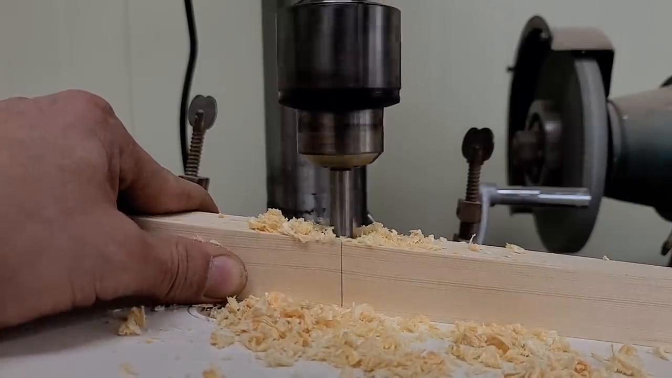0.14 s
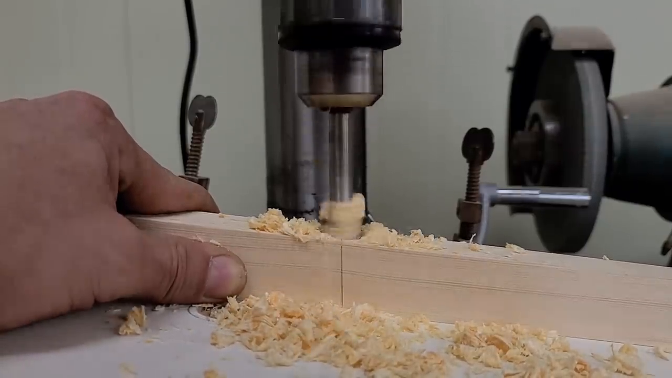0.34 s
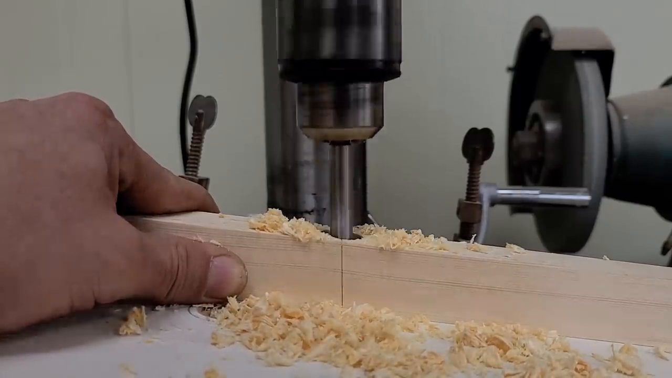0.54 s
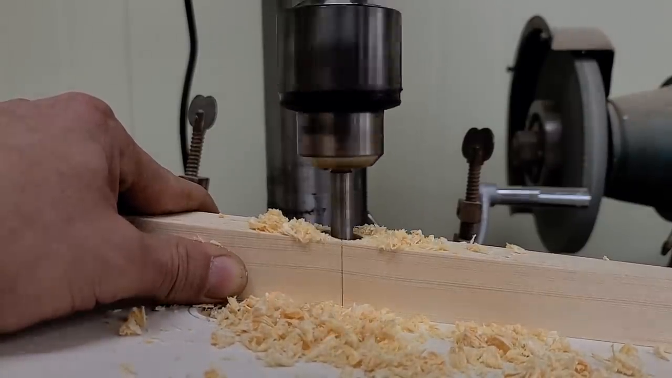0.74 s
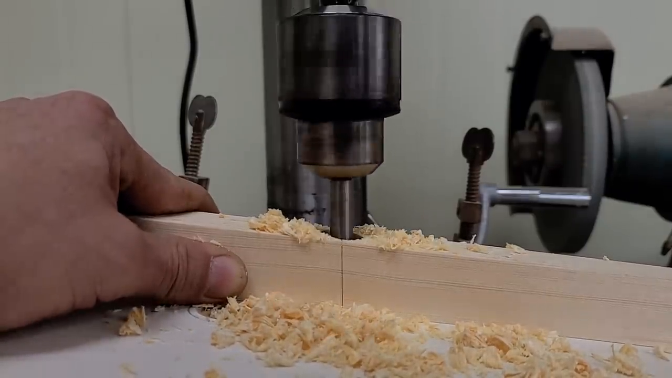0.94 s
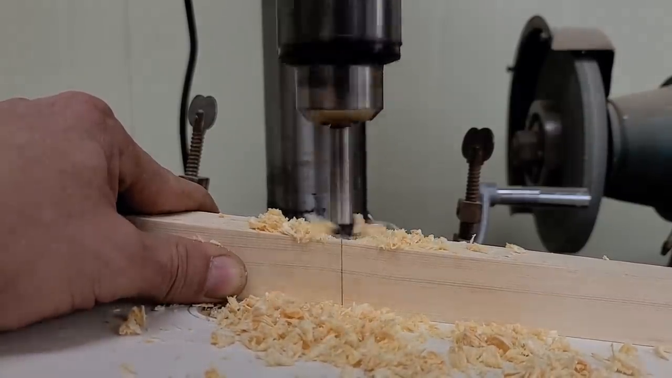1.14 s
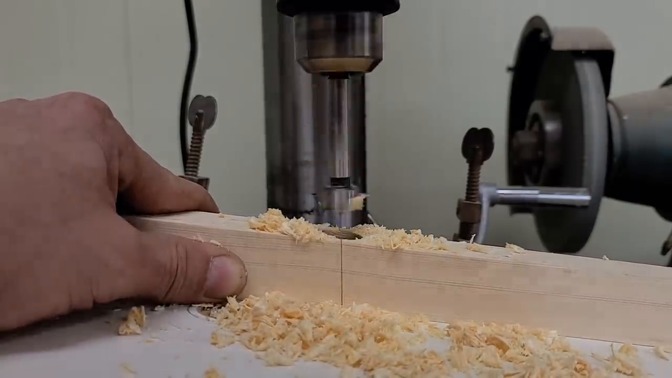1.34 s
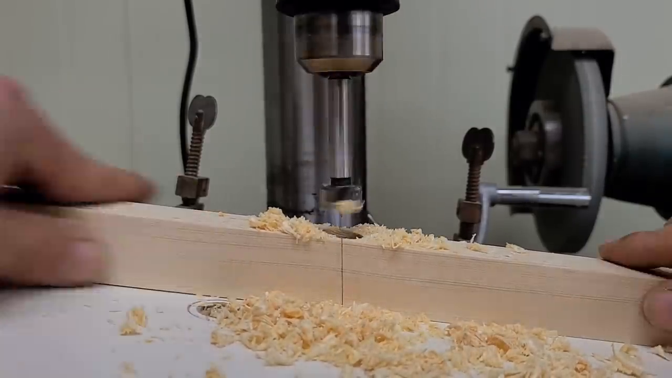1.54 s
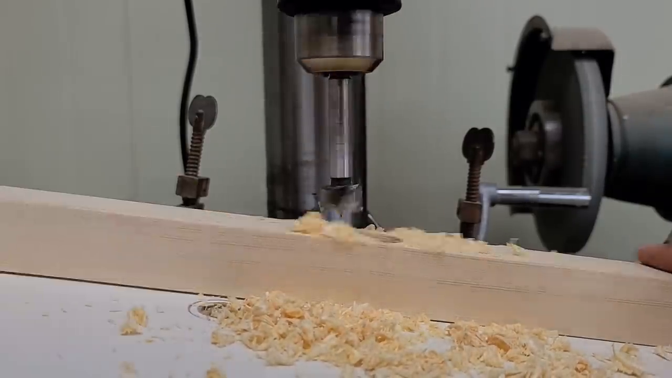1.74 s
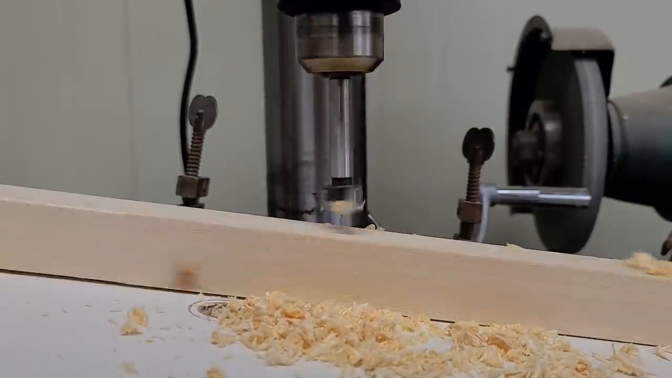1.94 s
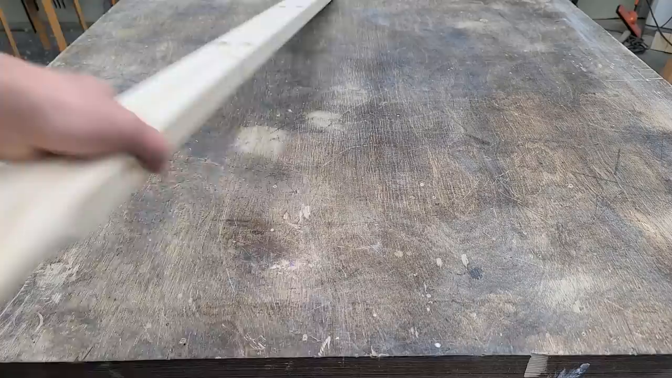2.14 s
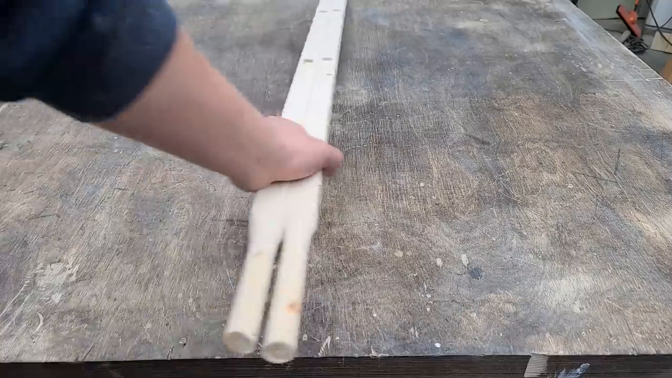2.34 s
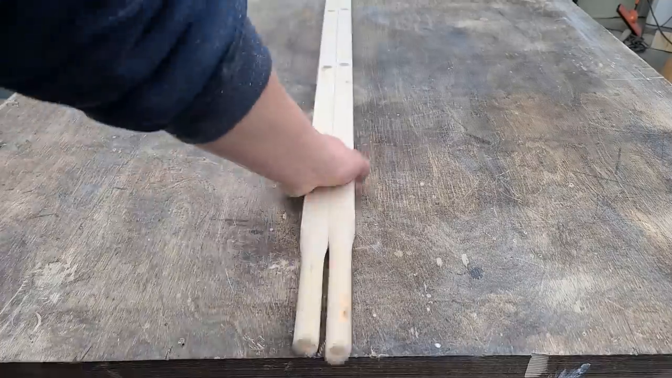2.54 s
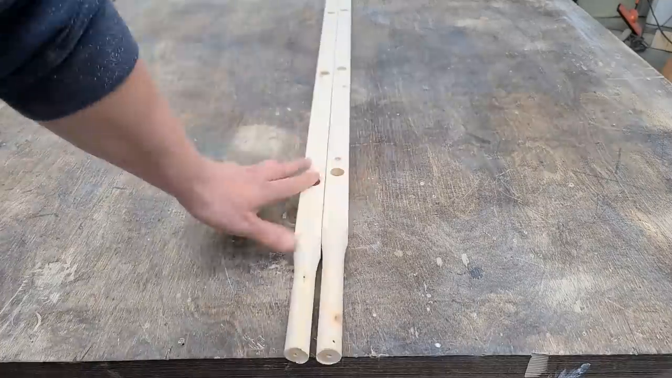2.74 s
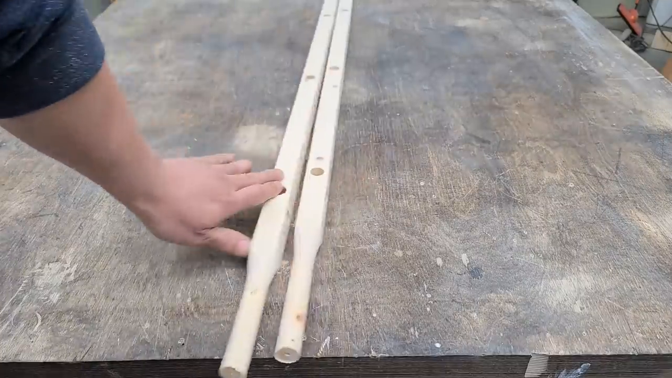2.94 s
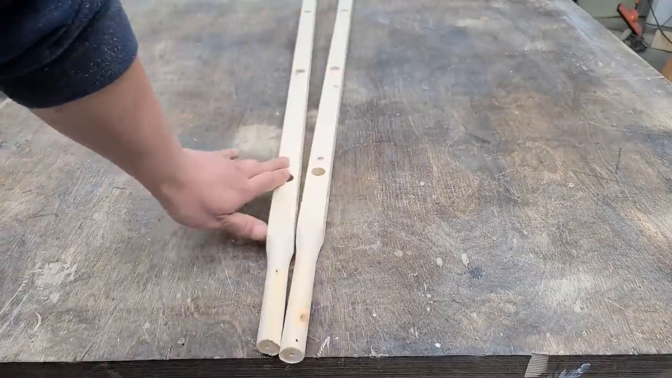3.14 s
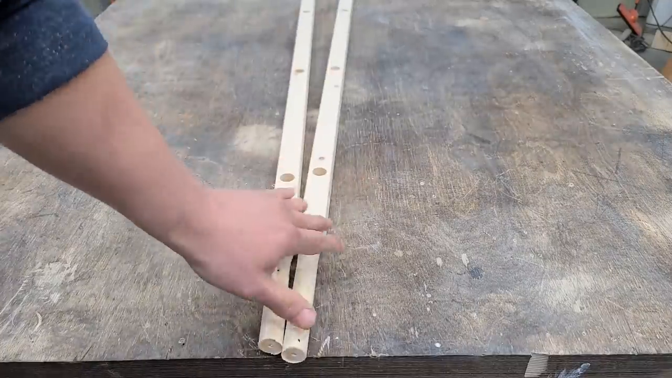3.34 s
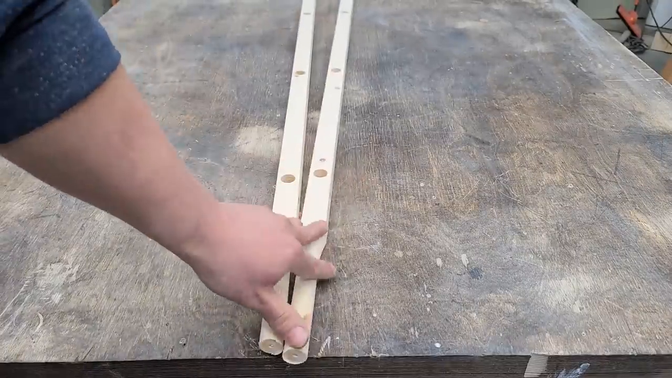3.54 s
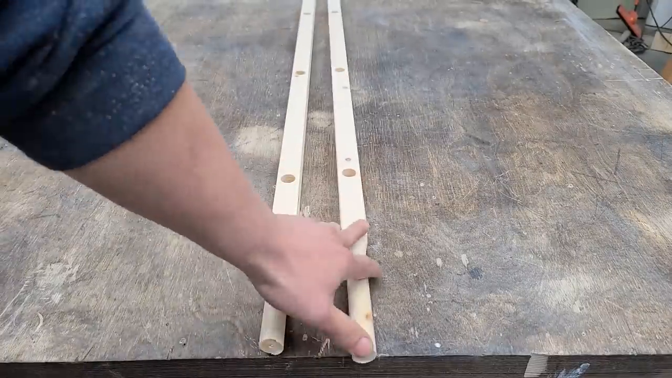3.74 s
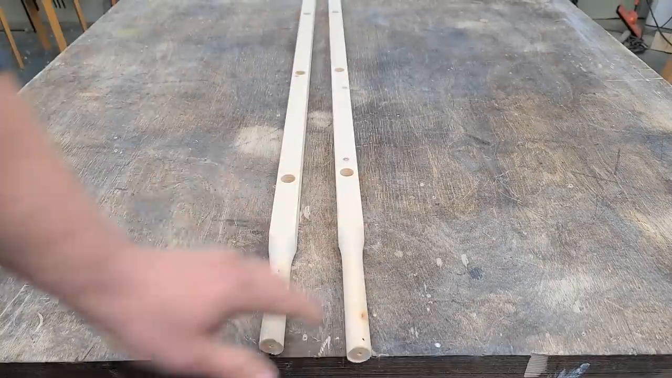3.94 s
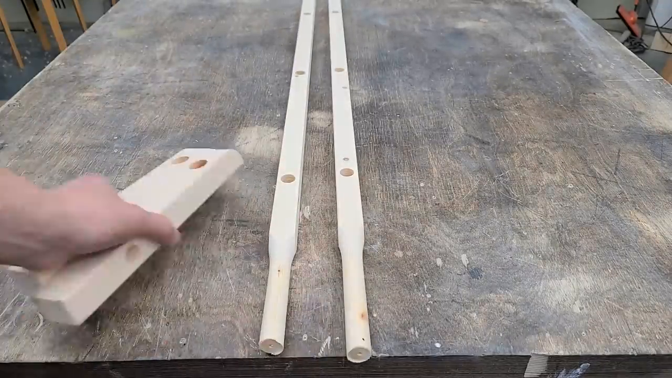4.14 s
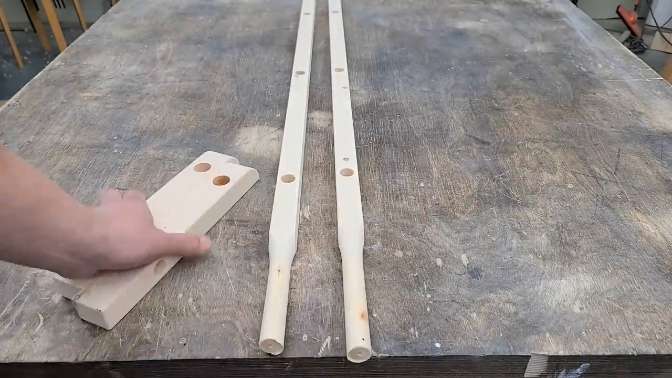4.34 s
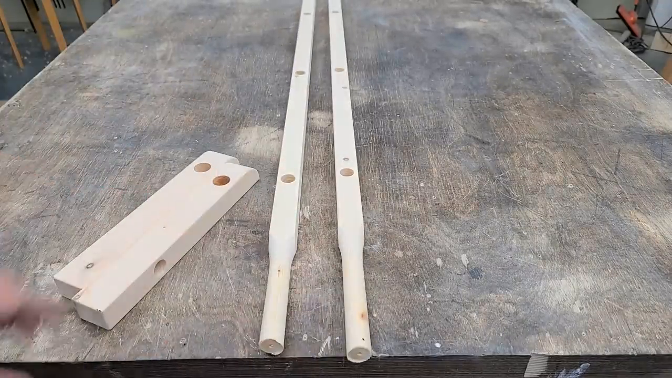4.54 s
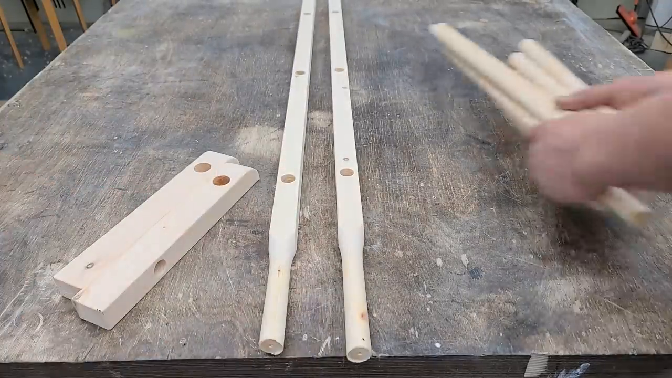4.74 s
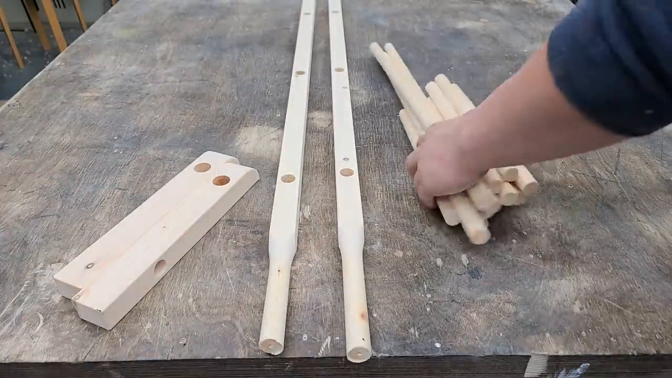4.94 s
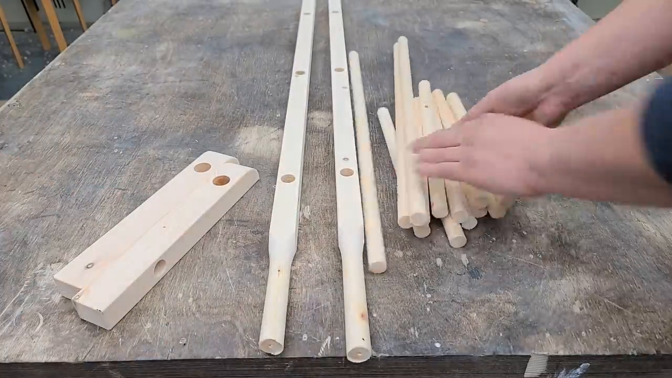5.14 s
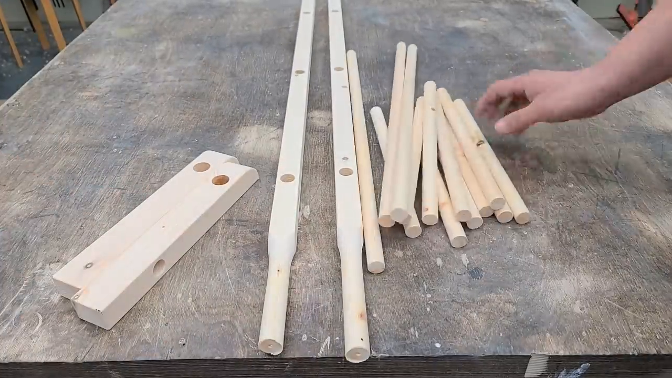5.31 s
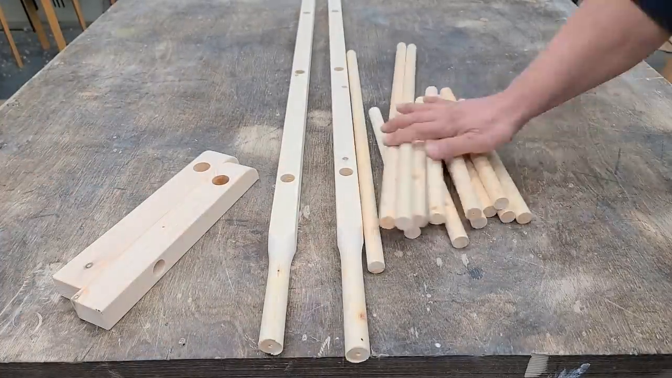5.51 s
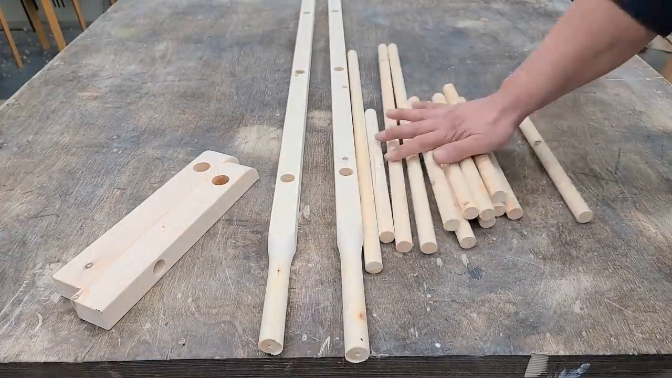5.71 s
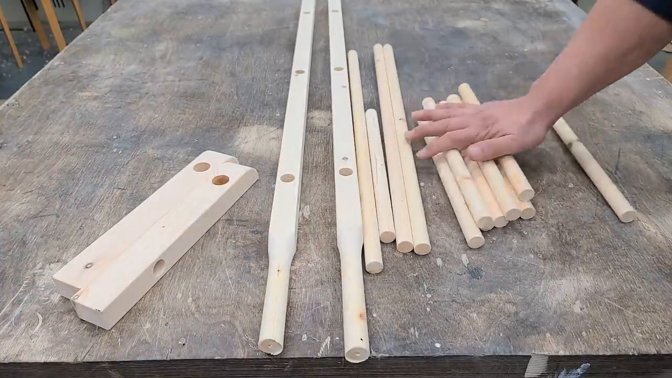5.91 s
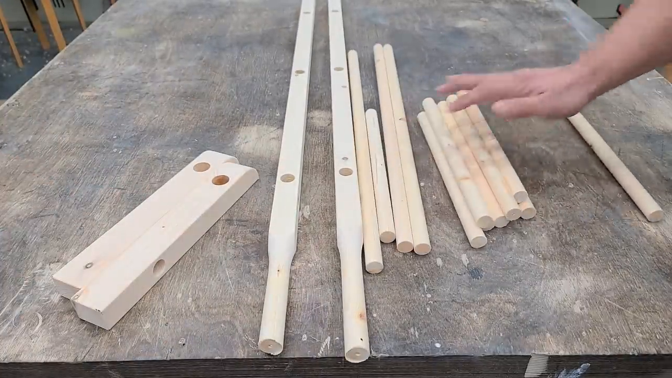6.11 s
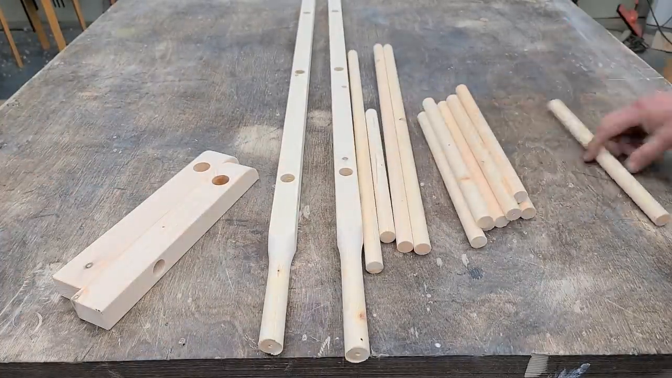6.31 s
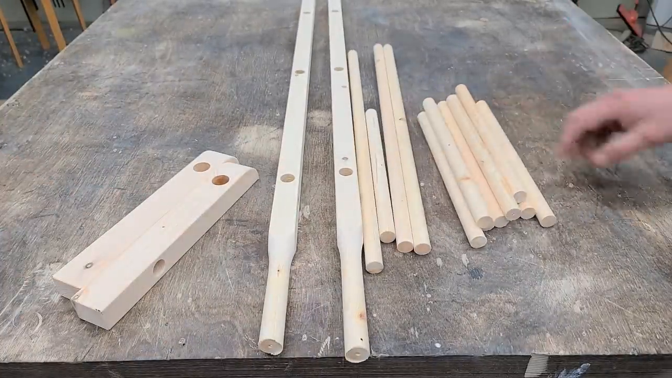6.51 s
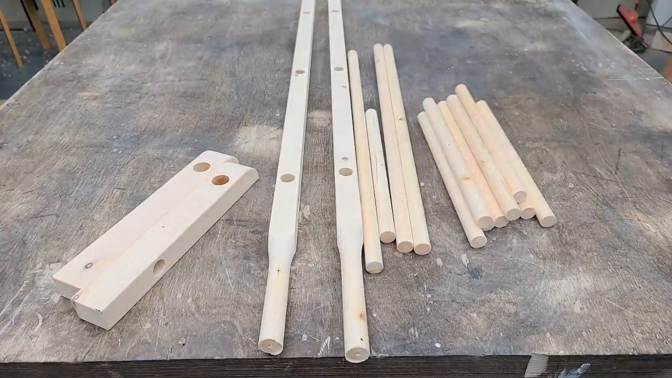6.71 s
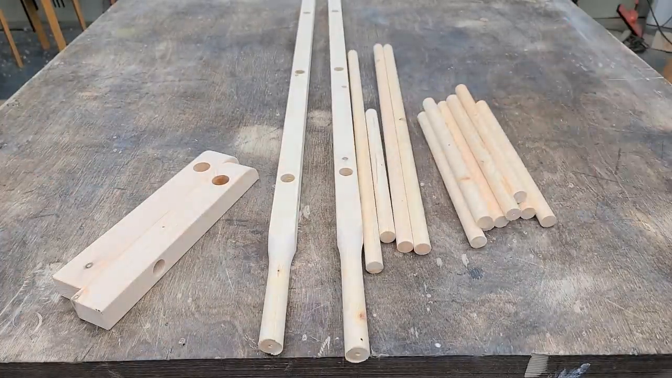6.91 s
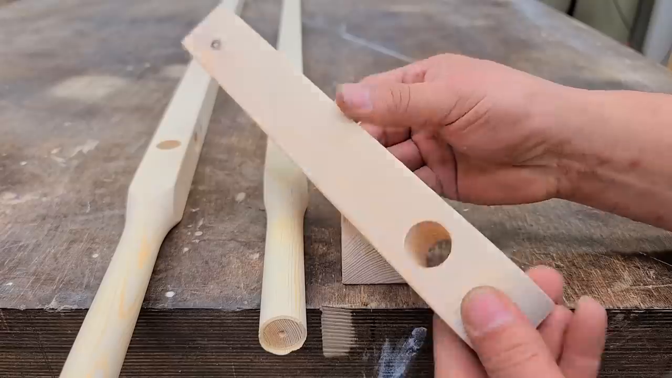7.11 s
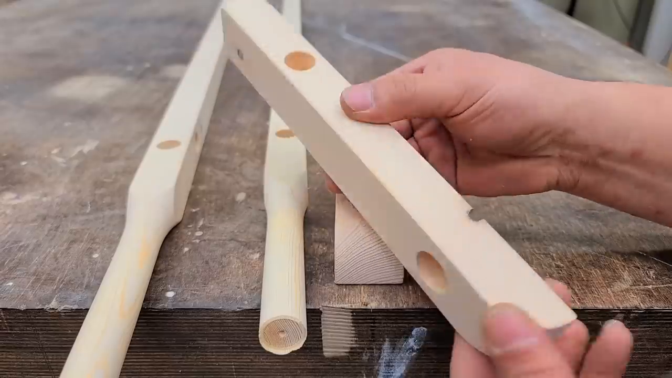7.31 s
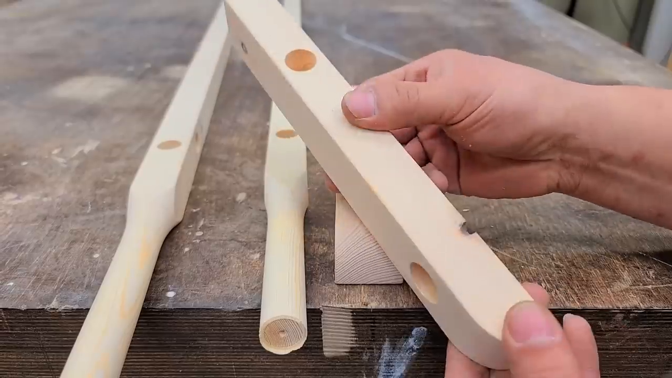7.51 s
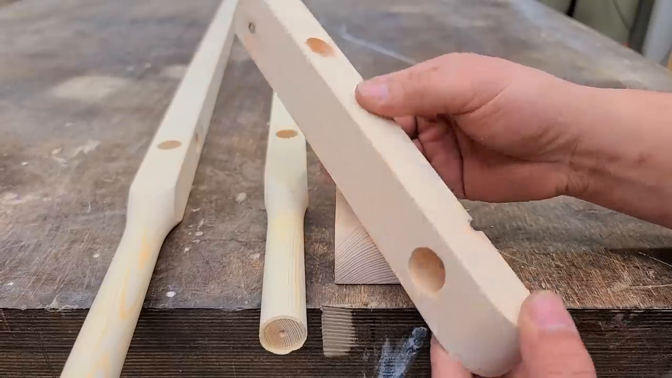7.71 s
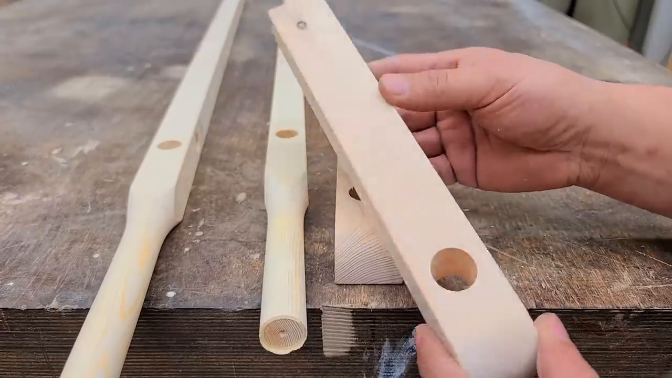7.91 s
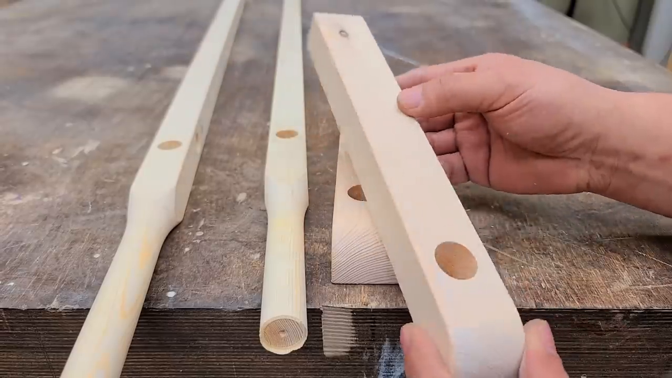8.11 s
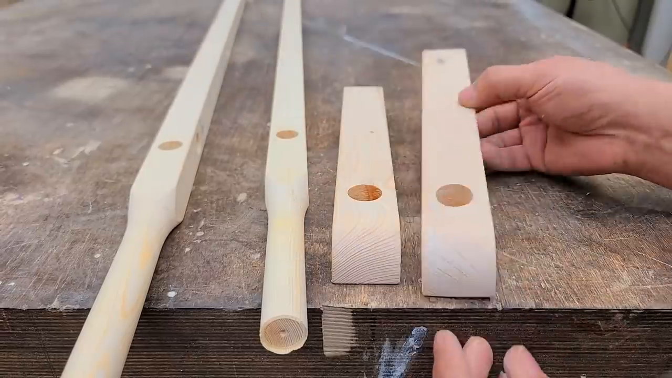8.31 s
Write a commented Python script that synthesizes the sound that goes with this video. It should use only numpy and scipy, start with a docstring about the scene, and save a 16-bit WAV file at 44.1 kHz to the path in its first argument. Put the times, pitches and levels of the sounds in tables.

```python
"""A drill press drones, rasps and hisses through a pine bar, which then slides along the table.
The scene cuts to a quiet bench: poles clap, a block is set down, dowels drop, roll and are brushed into a heap.
Filtered noise makes the drill, rubbing and air; smeared noise bursts ring the wood; a gliding sine hums.
It is heard as if sped up at the same pitch: blows blur over some 20 ms and left and right are only loosely alike."""
import sys
import numpy as np
from scipy import signal
from scipy.fft import next_fast_len
from scipy.io import wavfile
from scipy.ndimage import uniform_filter1d

SR = 44100
rng = np.random.default_rng(int(sys.argv[2]) if len(sys.argv) > 2 else 0)


def store_wav(level_fs):
    """Save 16-bit WAV to argv[1]."""
    pcm = np.round(np.clip(np.atleast_2d(level_fs), -1, 1) * 32767)
    wavfile.write(sys.argv[1], SR, pcm.T.astype(np.int16))


N = 373078  # length in samples

# the notes each wooden thing rings with: (f/Hz, relative level/dB, time to fall by 60 dB/s)
POLE = [(140, -9, .12), (280, -3, .08), (410, -6, .2), (610, -2, .03), (830, 0, .03), (1080, 0, .025),
        (1400, -1, .025), (2300, 2, .005), (3200, 3, .004), (4600, -7, .003)]
POLE_TIP = [(620, 0, .12), (850, -2, .05), (1130, 0, .04), (1340, 0, .06), (1930, -1, .025)]
BLOCK = [(250, -18, .05), (560, -11, .04), (1125, -17, .04), (1590, -8, .025), (1665, -11, .04),
         (1737, -2, .13), (1787, 1, .22), (4100, -17, .004)]
SHORT_DOWEL = [(950, -14, .035), (1340, -10, .03), (2450, 0, .09), (3400, -11, .012), (4200, -6, .06),
               (6400, -20, .02)]
LONG_DOWEL = [(1274, -6, .06), (2022, 0, .085), (2882, 7, .12), (3800, 5, .075), (4830, -3, .07),
              (5980, -12, .05), (6960, -15, .05)]

SHOP_CUT_S, CLOSE_CUT_S = 2.41, 7.2  # the scene cuts to the bench, then to hands close by


def undb(db):
    """Turn decibels into a gain."""
    return 10 ** (np.asarray(db) / 20)


def unit(x):
    """Scale to an rms level of 1."""
    return x / np.sqrt(np.mean(x ** 2))


def curves(table):
    """Join the points of each column with straight lines, one value a sample."""
    s, *columns = np.transpose(table)
    return [np.interp(np.arange(N) / SR, s, column) for column in columns]


def noise(size=N):
    """Unrelated noise left and right."""
    return rng.standard_normal((2, size))


def walk(rate):
    """Wandering random curve: values held for 1 / rate seconds, then smoothed twice."""
    k = int(SR / rate)
    steps = np.repeat(rng.standard_normal(N // k + 1), k)
    return uniform_filter1d(uniform_filter1d(steps, k), k)[:N]


def swell(s, length, attack=.17, release=.35):
    """Rise, hold and fall; attack and release are shares of the length."""
    t = np.arange(N) / SR
    rise = (t - s) / attack
    fall = (s + length - t) / release
    return np.clip(np.minimum(rise, fall) / length, 0, 1)


def band(x, hz, width):
    """Resonance with gain 1 at its centre."""
    return signal.lfilter(*signal.iirpeak(min(hz, .44 * SR), max(hz / width, .2), SR), x)


def dull(x, hz):
    """Steep loss of treble."""
    return signal.sosfilt(signal.butter(4, min(hz, .44 * SR), fs=SR, output="sos"), x)


def resonate(peaks, flicker_db=0., rate=20):
    """Noise through resonances, each filtered twice and flickering on its own; the sum has rms 1."""
    total = 0
    for hz, width, db in peaks:
        peak = unit(band(band(noise(), hz, width), hz, width))
        total = total + undb(db + flicker_db * walk(rate)) * peak
    return unit(total)


def ring(x, modes, pitch, top_pitch):
    """Decaying, warbling notes driven by x; pitch moves the lowest, top_pitch the highest, a blend the rest."""
    warble_hz, warble_depth = 55, .7
    spot_db, spot_detune = 1.8, .005  # the spot struck shifts each note's level and pitch
    k = int(SR / warble_hz)
    lowest_hz, highest_hz = modes[0][0], modes[-1][0]
    spots = rng.standard_normal((len(modes), 2))
    out = 0
    for (hz, db, t60), (detune, spot) in zip(modes, spots):
        shift = np.interp(np.log(hz), np.log([lowest_hz, highest_hz]), [pitch, top_pitch])
        note_hz = hz * shift * (1 + spot_detune * detune)
        pole = np.exp((2j * np.pi * note_hz - np.log(1000) / t60) / SR)
        shake = uniform_filter1d(uniform_filter1d(noise(x.shape[1]), k), k) * np.sqrt(k)
        warble = 1 + warble_depth * (shake + 1j * shake[::-1])  # moves level and phase
        note = (signal.lfilter([1], [1, -pole], x) * warble).imag
        note = note / np.linalg.norm(note, axis=1, keepdims=True)
        out = out + undb(db + spot_db * spot) * note
    out = dull(out, 1.5 * top_pitch * highest_hz)  # cut well above the highest note
    return out * np.linalg.norm(x) / np.linalg.norm(out)


def drill():
    """The table drones and shudders, the motor whines, the cutter rasps in uneven bites, shavings hiss."""
    # resonances: (f/Hz, width of each filter pass/Hz, relative level/dB)
    # motor and belt ringing the iron table
    table_peaks = [(185, 86, -16.5), (244.6, 60, -4.5), (305.4, 46, 0.5), (340, 160, -2), (374.4, 16, -5),
                   (425, 50, -6.5), (513, 58, -12), (602.7, 46, -12)]
    # tearing fibres ringing the bar and the bit
    rasp_peaks = [(815, 1080, 8), (1468, 580, 0.5), (2090, 880, -5), (2833, 450, -14)]
    # shavings and sliding wood
    hiss_peaks = [(2900, 730, 4), (3927, 2700, 0), (4780, 1200, -6), (7000, 3600, -3), (8320, 1800, -0.5),
                  (10550, 1400, -2.5), (12690, 2800, -1.5)]
    # thin steady tones of motor and bearings
    whine_peaks = [(1055, 14, -3.5), (1119.4, 40, 3.5), (1472, 10, -4.5), (1880, 14, -5), (5370, 50, -19.5)]
    # level of the hiss of shavings and sliding wood: (t/s, level/dB)
    hiss_points = [(0, -32.5), (.31, -35.5), (.37, -49), (.92, -54), (1.02, -40), (1.043, -26.5),
                   (1.06, -34), (1.078, -27), (1.1, -34), (1.115, -51.5), (1.44, -47.5), (1.5, -71.5),
                   (1.68, -68), (1.8, -54.5), (2.25, -53), (2.38, -65.5)]
    hiss_db = curves(hiss_points)[0]
    bite = walk(44.83)  # shared by drone, rasp and hiss

    # the table drones on and swells, a little late, with the hiss
    drone_idle_db, drone_over_hiss_db, drone_lag_s = -34, 8, 0.029
    lag = drone_lag_s * SR
    load = signal.lfilter([1], [lag, 1 - lag], undb(hiss_db + drone_over_hiss_db))
    drone_gain = np.hypot(undb(drone_idle_db), load) * undb(1.2 * bite)
    drone = resonate(table_peaks, flicker_db=1.0, rate=25) * drone_gain

    # the bit grabs and shakes the table: a wavering sine, a quarter cycle apart left and right
    judder_s, judder_length_s, judder_db, judder_hz = 1.068, 0.048, -19, 304.3
    turn = 2 * np.pi * np.cumsum(judder_hz + 12 * walk(60)) / SR
    judder = np.sin(turn + np.array([[0], [np.pi / 2]])) * undb(judder_db + 1.5 * walk(110))
    judder *= swell(judder_s, judder_length_s, 0.21, .1)

    whine = resonate(whine_peaks, flicker_db=0.5, rate=9) * undb(-49)

    # the rasp grows about half as many dB as the hiss
    rasp_idle_db, rasp_full_db, rasp_per_hiss_db, full_hiss_db = -46, -33.5, 0.52, -33
    cut_db = rasp_full_db + rasp_per_hiss_db * (hiss_db - full_hiss_db)
    rasp_gain = np.hypot(undb(rasp_idle_db), undb(cut_db)) * undb(0.57 * bite + 1.6 * walk(90))
    rasp = resonate(rasp_peaks, flicker_db=2.0, rate=25) * rasp_gain

    flutter_db = 0.72 * bite + 1.2 * walk(70.66) + 1.5 * walk(420)
    hiss = resonate(hiss_peaks, flicker_db=2.5, rate=51) * undb(hiss_db + flutter_db)
    fade_out = np.clip((SHOP_CUT_S - np.arange(N) / SR) / 0.021, 0, 1)
    return (drone + judder + whine + rasp + hiss) * fade_out


def blows():
    """Each blow is a smeared burst: a broad clack, a bright crack, the ring of the wood and a thud."""
    # blows: (t/s, thing struck, level/dB, ring against clack/dB, gain of the crack/dB,
    #         lowest note f/Hz, highest note f/Hz, clack colour f/Hz, time constant of the fall/s)
    blow_list = [(2.8, POLE, -22.5, 1.5, -24.5, 144.2, 4600, 1500, 0.019),
                 (3.312, POLE_TIP, -49.5, 5.5, -28, 636, 1930, 1310, 0.012),
                 (3.338, POLE_TIP, -55, 4.5, -28, 620, 1930, 1910, 0.01),
                 (4.487, BLOCK, -43.5, 5, -29.5, 250, 4100, 1680, 0.0074),
                 (4.516, BLOCK, -29.5, 11, -23.5, 250, 4100, 1760, .011),
                 (5.087, SHORT_DOWEL, -25, -5.5, -38, 980, 6420, 1830, 0.0088),
                 (5.18, SHORT_DOWEL, -33, -1, -26, 840, 6590, 1450, 0.012),
                 (5.214, SHORT_DOWEL, -20.5, -5, -10, 960, 6700, 3280, .008),
                 (5.247, SHORT_DOWEL, -25.5, 3, -20, 944, 6360, 1330, 0.012),
                 (5.324, SHORT_DOWEL, -30, 9, -6.5, 951, 6395, 1380, 0.0044),
                 (5.363, SHORT_DOWEL, -22, 0.5, -9.5, 1039, 6710, 2580, 0.007),
                 (5.384, LONG_DOWEL, -27, -0.5, -21.5, 1162, 6600, 3540, .008),
                 (5.418, SHORT_DOWEL, -33, 4, -7.5, 898, 6516, 1820, 0.0087),
                 (5.507, SHORT_DOWEL, -41.5, 10, -9.5, 1054, 6194, 3900, 0.006),
                 (5.535, SHORT_DOWEL, -36.5, 6.5, -23, 991, 6255, 2940, 0.0063),
                 (5.75, SHORT_DOWEL, -51, -2, -16, 976, 6350, 1380, 0.02),
                 (5.801, SHORT_DOWEL, -25.5, 0.5, -28, 988, 6760, 2210, 0.0066),
                 (5.879, SHORT_DOWEL, -37.5, -8.5, -21, 924, 6400, 1950, 0.0058),
                 (5.921, SHORT_DOWEL, -34.5, -12.5, -20.5, 959, 6400, 1290, .01),
                 (5.951, LONG_DOWEL, -33, 13, -10.5, 1214, 6974, 1300, .006),
                 (5.977, LONG_DOWEL, -31, 12, -11.5, 1292, 6860, 1285, 0.005),
                 (6.012, LONG_DOWEL, -34, 3, -19.5, 1304, 7100, 1230, 0.0045),
                 (6.106, SHORT_DOWEL, -41, -5.5, -31, 1040, 6300, 1200, 0.012),
                 (6.155, SHORT_DOWEL, -38, 6.5, -20, 905, 6460, 960, 0.0082),
                 (6.352, SHORT_DOWEL, -43, 4, -26, 830, 6435, 2230, 0.0028),
                 (6.412, SHORT_DOWEL, -51, 9.5, -21, 890, 6550, 2520, 0.0032),
                 (6.718, SHORT_DOWEL, -30, -10.5, -35, 983, 6580, 2300, 0.012),
                 (6.742, SHORT_DOWEL, -36.5, -8, -38, 984, 6270, 2000, .014)]
    smear_s = 0.017  # rise time
    knock_db, knock_width = -4, .14  # hollow core in each clack; width as a share of its colour
    out, t = np.zeros((2, N)), np.arange(SR // 3) / SR
    rise = np.sin(np.pi / 2 * np.clip(t / smear_s, 0, 1)) ** 2
    for s, modes, db, ring_db, crack_db, low_hz, top_hz, hz, fall_s in blow_list:
        burst = noise(len(t)) * rise * np.exp(-np.maximum(t - smear_s, 0) / fall_s)

        clack = dull(band(burst, hz, 0.77 * hz), 1.65 * hz)
        core = band(band(burst, hz, knock_width * hz), hz, knock_width * hz)
        clack = clack / np.linalg.norm(clack) + undb(knock_db) * core / np.linalg.norm(core)
        clack *= np.linalg.norm(burst) / np.linalg.norm(clack)

        tone = ring(burst, modes, low_hz / modes[0][0], top_hz / modes[-1][0])
        crack = dull(band(burst, 9400, 6500), 12000)
        crack = crack + undb(-9.5) * band(band(burst, 13500, 5000), 13500, 5000)
        thud = undb(-6.0) * band(band(burst, 340, 250), 340, 250)  # the bench top answers

        i = int((s - 0.57 * smear_s) * SR)  # start early so the rise straddles the listed time
        out[:, i:i + len(t)] += undb(db) * (clack + undb(ring_db) * tone + undb(crack_db) * crack + thud)
    return out


def jostle():
    """How lively the loose dowels are, as a gain that swells and sinks with each roll."""
    # dowels rolling and jostling between the blows: (t/s, length/s, level/dB)
    roll_list = [(5.151, 0.23, -39.5), (5.288, 0.22, -40), (5.458, 0.14, -48.5), (5.817, 0.51, -56.5),
                 (6.256, 0.26, -67)]
    return sum(undb(db) * swell(s, length, 0.46, 0.4) ** 2 for s, length, db in roll_list)


def rolling():
    """Rough noise stands for dense little knocks and rings dowels at three pitches."""
    knocks = noise() * jostle() * undb(walk(78))
    heap = sum(ring(knocks, SHORT_DOWEL, pitch, pitch) for pitch in (.78, .99, 1.13))
    clatter = dull(band(knocks, 1200, 2000), 4900)
    ticks = dull(band(knocks, 8400, 9000), 9400)
    return undb(-3.5) * heap + undb(6.5) * clatter + undb(-23.0) * ticks


def lone_dowel():
    """The grain of the bench keeps a rolling dowel ringing, unevenly, on its two strongest notes."""
    # one dowel rolling alone: (t/s, length/s, level/dB)
    solo_list = [(5.516, 0.17, -51.5), (6.432, 0.31, -63.5)]
    gain = sum(undb(db) * swell(s, length) for s, length, db in solo_list)
    drive = gain * noise() * undb(3.0 * walk(40))
    strongest = sorted(SHORT_DOWEL, key=lambda mode: -mode[1])[:2]
    return ring(drive, sorted(strongest), 0.98, 1)


def brushing():
    """Soft patchy swells of rubbing: the grain of the wood, a whisper of skin, now and then a short tone."""
    # skin and wood brushing: (t/s, length/s, level/dB, treble against that level/dB)
    rub_list = [(2.378, 0.26, -68, -14), (2.555, 0.28, -62.5, -11), (2.922, 0.081, -64.5, -3),
                (3.115, 0.16, -57, -11), (3.267, 0.14, -61, -15), (4.936, 0.18, -60, -17),
                (6.56, 0.26, -62, -12.5), (6.79, 0.46, -73, -5.5), (6.955, 0.05, -68.5, -20),
                (7.497, 0.1, -80, 12.5), (7.93, 0.11, -86, 10), (8.068, .09, -72.5, -7),
                (8.413, 0.06, -67, -6.5)]
    # short tones: one chirp during the drilling, the rest faint, among the handling:
    # (t/s, length/s, level/dB, f/Hz)
    tone_list = [(1.22, 0.024, -32, 1050), (2.426, 0.17, -63.5, 1056), (2.636, 0.16, -64.5, 1510),
                 (4.945, .12, -71, 10360), (6.638, 0.048, -53, 870), (7.31, 0.15, -76, 3760),
                 (7.51, 0.035, -67, 1780), (7.53, 0.048, -68, 1980), (7.532, 0.055, -75, 4100),
                 (7.93, .07, -75, 1760), (7.93, 0.13, -75, 3790), (8.056, 0.12, -76, 3800)]
    # colour of wood grain: (f/Hz, width of each filter pass/Hz, relative level/dB)
    grain_peaks = [(1100, 500, 1), (1620, 160, -0.5), (2500, 2500, 2), (3300, 500, -6)]
    # colour of skin, same columns
    skin_peaks = [(7000, 9700, 0)]
    tone_width, widest_hz = .12, 150  # width as a share of the tone's frequency, up to a limit in Hz
    grain_gain = sum(undb(db) * swell(s, length) for s, length, db, _ in rub_list)
    skin_gain = sum(undb(db + treble_db) * swell(s, length) for s, length, db, treble_db in rub_list)
    grain = grain_gain * resonate(grain_peaks, flicker_db=3.5, rate=26)
    skin = skin_gain * resonate(skin_peaks, flicker_db=3.0)
    tones = 0
    for s, length, db, hz in tone_list:
        peak = (hz, min(tone_width * hz, widest_hz), 0)
        tones = tones + undb(db) * swell(s, length) * resonate([peak], flicker_db=2.0, rate=35)
    return (grain + skin + tones) * undb(2 * walk(40))


def shop():
    """A wavering sine hums outside the shop; filtered noise makes a low rumble and still air."""
    # the hum swells and sinks: (t/s, f/Hz, level/dB)
    hum_points = [(0, 56.04, -60), (1.6, 57.3, -57.5), (1.95, 53.5, -50), (2.5, 51.9, -80.5),
                  (3.4, 59.38, -76.5), (3.6, 56.9, -52.5), (4.9, 51.28, -55), (5.08, 57.6, -47),
                  (5.5, 57.3, -48.5), (5.62, 56.2, -68.5), (5.72, 57, -50), (6.3, 51.6, -55),
                  (6.55, 49.9, -58.5), (7.15, 49.5, -80), (7.3, 49.34, -55.5), (8.46, 49.7, -86)]
    # low rumble: (f/Hz, width of each filter pass/Hz, relative level/dB)
    rumble_peaks = [(30, 14, -3), (82, 76, 0), (182, 130, -12), (258, 27, -14.5)]
    # still air, same columns
    air_peaks = [(402, 300, 5), (890, 1100, 4), (1429, 1500, -9), (3030, 930, -11), (4460, 10000, -17.5),
                 (9000, 5800, -12)]
    # rumble level/dB at the drill, at the bench, close by
    rumble_levels = (-49, -58, -50.5)
    air_db = -67
    hz, hum_db = curves(hum_points)
    turn = 2 * np.pi * np.cumsum(hz + 6.2 * walk(12)) / SR
    side_phase = np.array([walk(3.3), 0.41 * walk(5.5) - 0.8])  # left and right drift apart
    hum = np.sqrt(2) * np.sin(turn + side_phase) * undb(hum_db + 2 * walk(13))

    place = np.searchsorted([SHOP_CUT_S, CLOSE_CUT_S], np.arange(N) / SR)
    rumble_db = np.array(rumble_levels)[place]
    rumble = resonate(rumble_peaks, flicker_db=1.0, rate=5.1) * undb(rumble_db + 1.5 * walk(5.1))
    air = resonate(air_peaks, flicker_db=0.5, rate=3.3) * undb(air_db + 1.8 * walk(3.4))
    return hum + rumble + air


def room(x):
    """Diffuse echoes: x is smeared by a tail of noise bands that each die away at their own pace."""
    # decay of the room: (f/Hz, time to fall by 60 dB/s)
    decays = [(250, 0.32), (700, 0.15), (1500, 0.28), (3000, 0.091), (6000, 0.071), (11000, 0.12)]
    t = np.arange(SR // 2) / SR
    tail = 0
    for hz, t60 in decays:
        band_noise = unit(band(noise(len(t)), hz, hz)) / np.sqrt(SR / hz)  # wider bands carry more energy
        tail = tail + band_noise * np.exp(-np.log(1000) * t / t60)
    tail = tail / np.sqrt(np.sum(tail ** 2) / 2)
    return signal.fftconvolve(x, tail, axes=1)[:, :N]


def scene():
    """Mix the drill, the bench with its room echo, the brushing and the background."""
    bench = blows() + rolling() + lone_dowel()
    return drill() + bench + undb(-4.5) * room(bench) + brushing() + shop()


def record(dry):
    """The right repeats part of the left a quarter cycle late and is a little quieter; the top is cut steeply."""
    shared = .3  # share of the left side heard on the right
    top_hz = 15830
    late = signal.hilbert(dry[0], next_fast_len(N))[:N].imag
    right = np.sqrt(1 - shared ** 2) * dry[1] + shared * late
    both = np.array([dry[0], right]) * undb([[.4], [-.4]])
    return signal.sosfilt(signal.ellip(10, .2, 80, top_hz, fs=SR, output="sos"), both)


dry = scene()
out = record(dry)
store_wav(out)
```